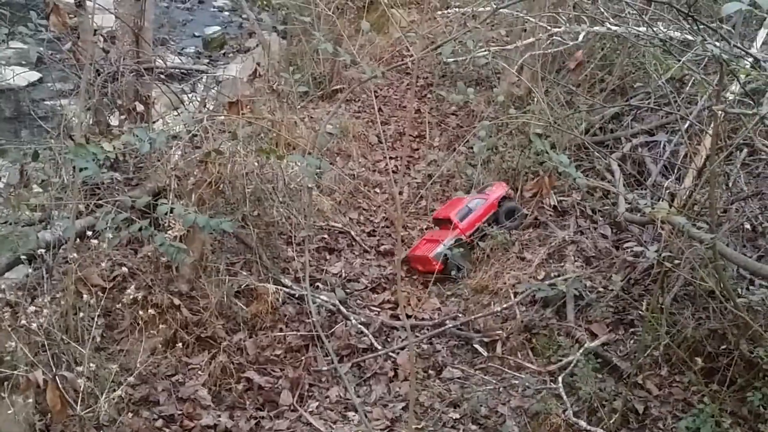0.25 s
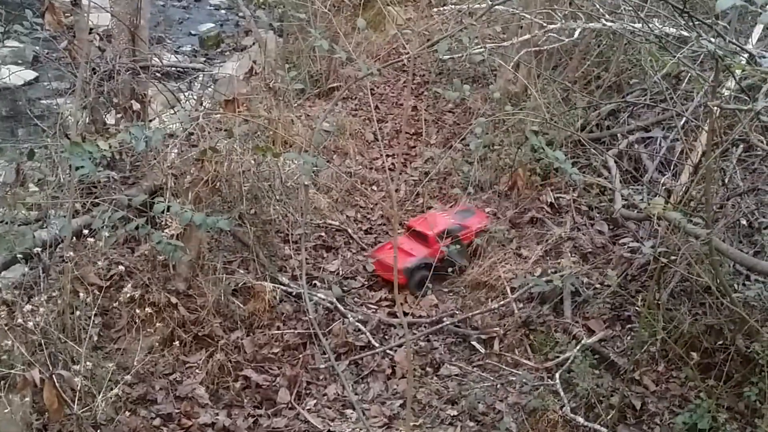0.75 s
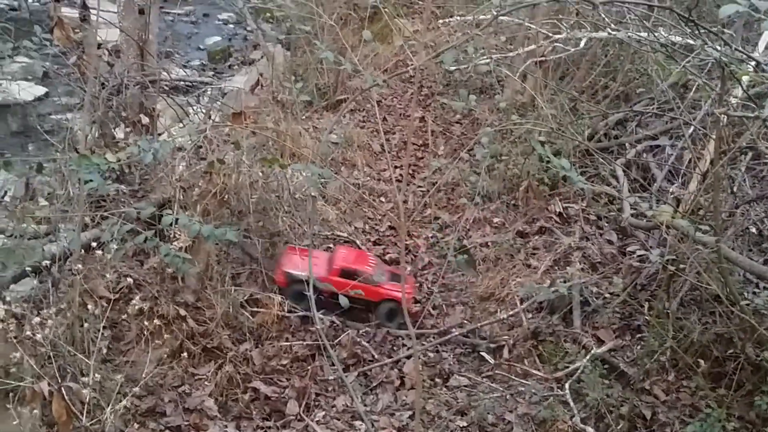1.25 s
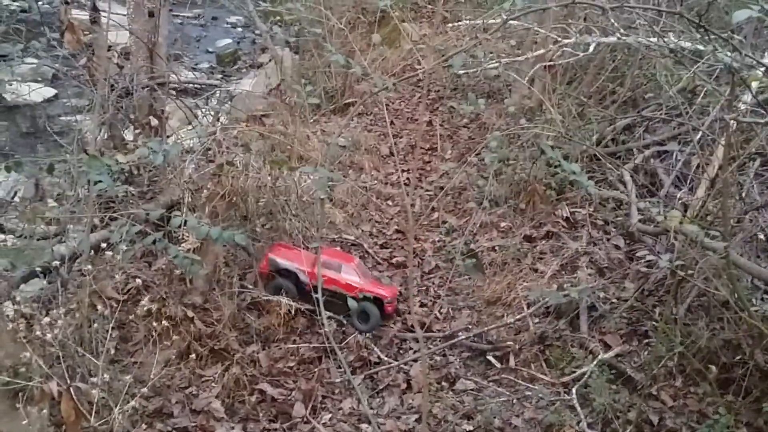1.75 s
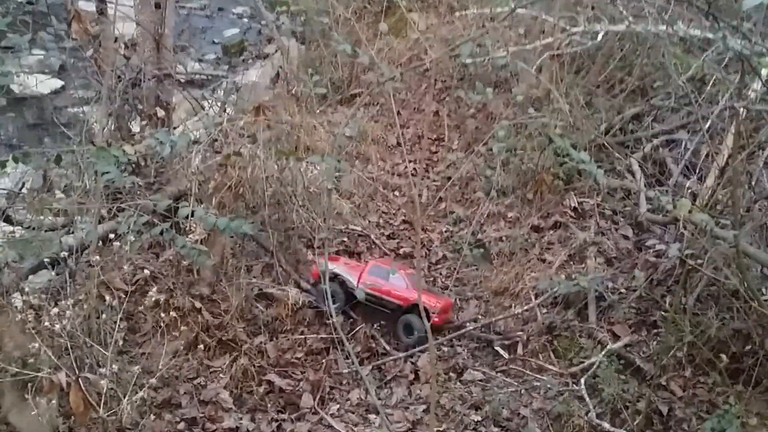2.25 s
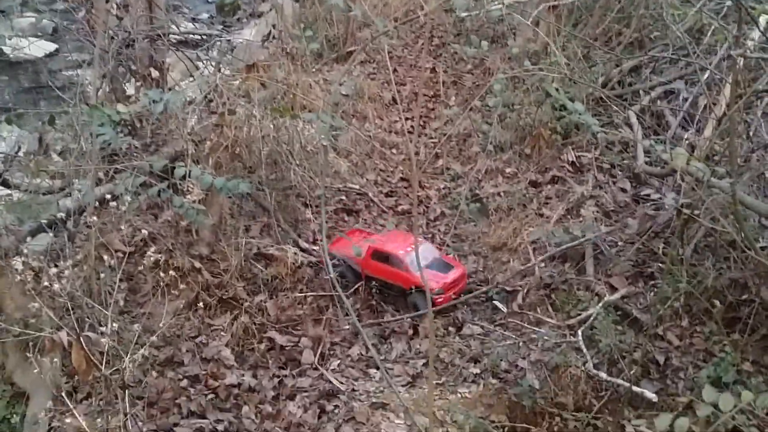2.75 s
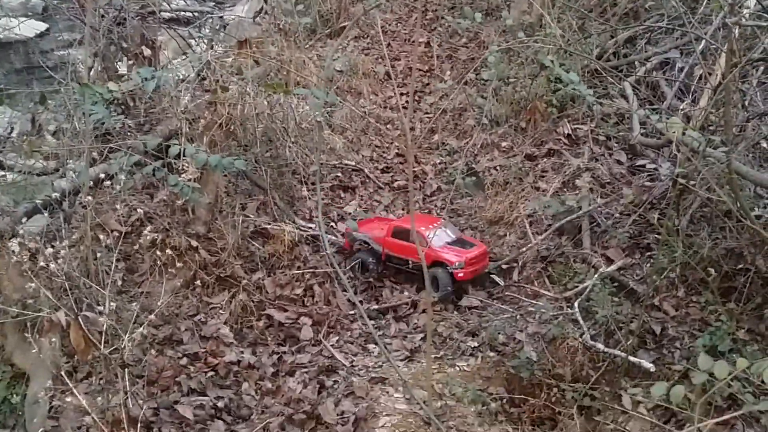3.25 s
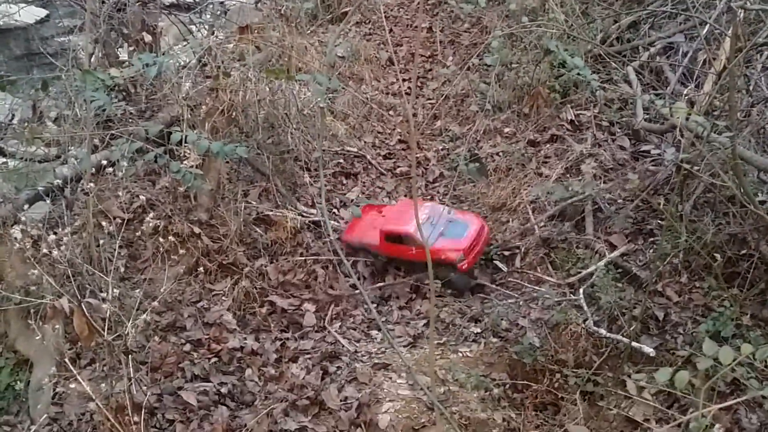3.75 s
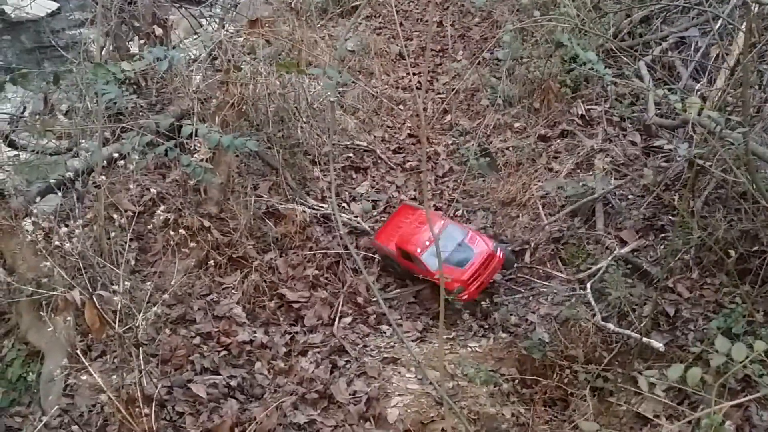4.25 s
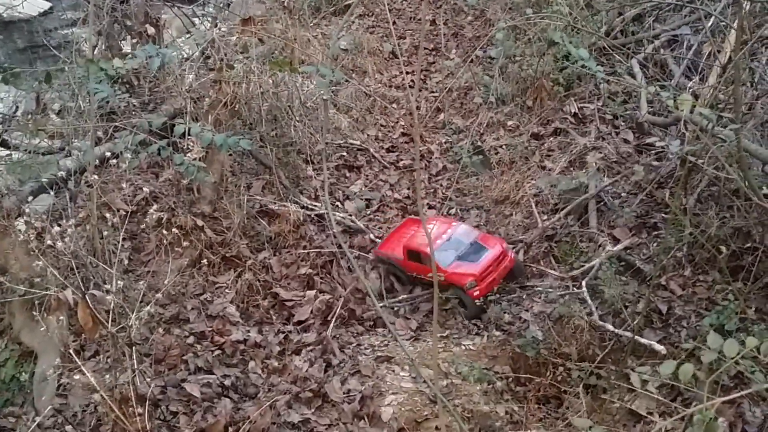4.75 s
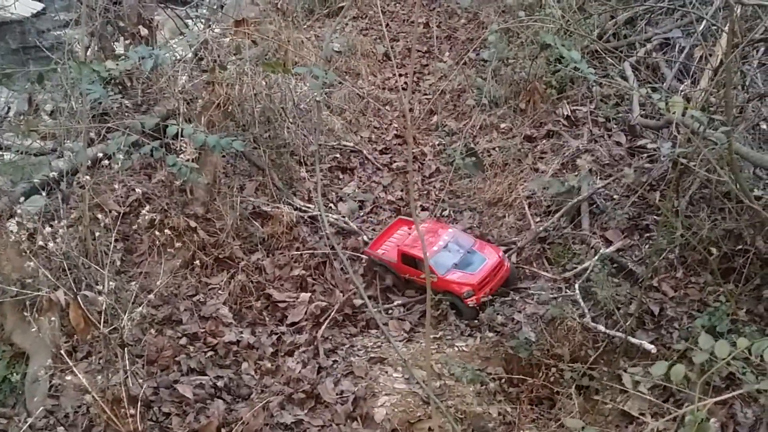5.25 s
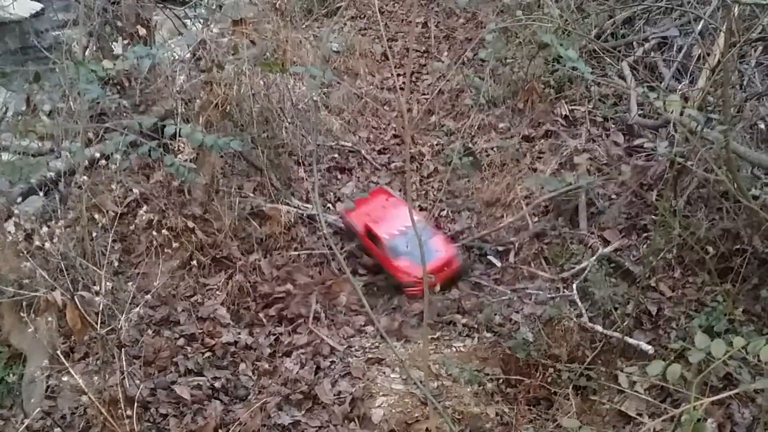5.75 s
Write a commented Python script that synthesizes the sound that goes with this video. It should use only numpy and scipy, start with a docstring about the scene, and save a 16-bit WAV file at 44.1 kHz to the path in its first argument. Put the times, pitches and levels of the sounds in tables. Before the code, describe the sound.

Outdoors in woods, a small electric toy truck moves over dry leaves, heard in close, bright stereo over a faint, slowly fading distant rumble. A few light plastic ticks and a soft crackle open the scene. From about 0.6 to 1.4 seconds it surges, crunching leaves, snapping twigs and giving brief high gear whines. Shorter bursts follow near 1.8 and 2.0 with sharp cracks and hollow knocks, then lighter rustling to 2.9. Tires rattle rapidly on the plastic shell around 3.0 and again from 3.4 to 3.9, with snaps continuing to 4.4. A fuller crunch and chassis knock come at 4.5 to 4.8. Thin motor whine and lighter crackle surface near 5.1, then hollow thumps build from 5.5 into the strongest lurch and loudest cracks around 5.7 to 5.8, dropping quickly away. Tiny leaf chirps run throughout, with only a very short tail from the trees.

```python
"""Toy truck on dry leaves in a wood

A small electric toy truck claws back and forth over dry leaves and twigs.
Leaves crush in dense grains, twigs snap and stiff leaf edges chirp against rubber and plastic.
Tyre lugs rattle on the plastic shell, the hollow chassis booms over bumps and the gears whine thinly.
Two microphone ports with unlike peaks and dips hear it with a short tail from the trees and a far rumble."""
import sys
import numpy as np
from scipy import signal
from scipy.fft import rfft, irfft
from scipy.io import wavfile
from scipy.ndimage import uniform_filter1d

SR = 44100
rng = np.random.default_rng(int(sys.argv[2]) if len(sys.argv) > 2 else 0)


def transcribe(signal):
    """Save signal, clipped to [-1, 1], as a 16-bit WAV file at the path in sys.argv[1]."""
    frames = np.atleast_2d(signal).T
    limited = np.clip(frames, -1, 1)
    pcm = np.round(limited * 32767).astype(np.int16)
    wavfile.write(sys.argv[1], SR, pcm)


def gain_from_db(level_db):
    """Convert decibel levels to linear amplitude factors (20 dB per decade)."""
    decades = np.asarray(level_db, float) / 20
    return 10 ** decades


N = 264589   # samples

# tyre lugs catching the shell; the low share goes to the shell modes below 1500 Hz:
# start_s [s], peak_db [dB], low_share_db [dB]
LUG_CATCHES = [(0.1052, -16.5, -27), (0.1336, -18.5, -15), (0.183, -22, -15.5), (1.2184, -33, -1),
               (1.3634, -31.5, -4), (1.7574, -18.5, -22), (1.779, -18.5, -12), (2.0333, -19, -15.5),
               (2.0441, -13.5, -22), (2.0504, -19.5, -8.5), (2.9265, -9, -20), (2.9515, -14.5, -14.5),
               (2.9696, -16, -28), (2.991, -21.5, -19), (3.017, -15, -28), (3.045, -14, -12.5),
               (3.088, -12, -19), (3.3951, -17.5, -11), (3.481, -17.5, -15), (3.5438, -22.5, -11),
               (3.5745, -14.5, -38), (3.603, -9.5, -23), (3.6364, -14.5, -19), (3.6638, -12.5, -33),
               (3.681, -12.5, -27), (3.8357, -10, -15), (3.918, -22, -5.5), (4.6663, -24, -3),
               (4.6744, -34, -18), (5.7576, -32, 9), (5.7994, -34, 4), (5.816, -21, -2.5)]


def rms_one(x):
    """Scale to rms 1."""
    return x / np.sqrt(np.mean(x ** 2) + 1e-20)


def at_hz(points, hz):
    """Read a spectrum of (Hz, dB) points on a log frequency axis."""
    point_hz, point_db = np.transpose(points)
    return np.interp(np.log(hz), np.log(point_hz), point_db)


def drift(rate_hz):
    """Slow random wander of rms 1: noise through two one-pole low-passes at rate_hz."""
    hop = 40   # samples between points of the wander
    r = np.exp(-2 * np.pi * rate_hz * hop / SR)
    slow = signal.lfilter([1], [1, -2 * r, r * r], rng.standard_normal(N // hop + 2002))
    slow = rms_one(slow[2000:])   # the filter has settled by here
    return np.interp(np.arange(N) / hop, np.arange(len(slow)), slow)


def ring(clicks, hz, t60):
    """A damped resonance: a unit click sets a sine of height 1 ringing, down 60 dB after t60 seconds."""
    r = gain_from_db(-60 / (t60 * SR))
    w = 2 * np.pi * hz / SR
    return signal.lfilter([0, np.sin(w)], [1, -2 * r * np.cos(w), r * r], clicks + 1e-18)


def soften(x, hz):
    """A soft contact dulls the treble: two one-pole low-passes."""
    r = np.exp(-2 * np.pi * hz / SR)
    return signal.lfilter([(1 - r) ** 2], [1, -2 * r, r * r], x)


def chatter(per_s, spread_db):
    """Random clicks of either sign, most small, a few large; rms 1."""
    sizes = gain_from_db(spread_db * np.minimum(rng.exponential(1, N), 5)) * rng.choice([-1, 1], N)
    happens = rng.random(N) < per_s / SR
    return rms_one(sizes * happens / np.sqrt(per_s))


def struck(modes, times, peaks_db, contact_s, scatter_db):
    """Each blow is a ragged burst of contacts; every mode takes it with a strength of its own."""
    length = 600   # samples
    steps = np.arange(length)
    at = (np.asarray(times) * SR).astype(int)[:, None] + steps
    burst = rng.standard_normal(at.shape) * np.exp(-steps / (contact_s * SR))
    chance_db = rng.normal(0, scatter_db, (len(at), len(modes)))
    out = 0
    for k, (hz, level_db, t60) in enumerate(modes):
        # the swing that the burst builds up in this mode sets how much force it needs
        swing = np.abs(np.cumsum(burst * np.exp(-2j * np.pi * hz * steps / SR), axis=1))
        height = gain_from_db(peaks_db(hz) + level_db + chance_db[:, k])
        force = np.zeros(N + length)
        np.add.at(force, at, burst * (height / swing.max(axis=1))[:, None])
        out = out + ring(force[:N], hz, t60)
    return out


def peaks_in_time(starts, lengths, levels_db, slopes, rise, fall):
    """Power of each event in time: a climb, a sloping hold and a fall, all straight in dB."""
    since = np.arange(N) / SR - np.asarray(starts)[:, None]
    lengths, levels_db, slopes = [np.reshape(v, (-1, 1)) for v in (lengths, levels_db, slopes)]
    hold_db = levels_db + slopes * np.clip(since, 0, lengths)
    climb_db = rise * np.minimum(since, 0)
    fall_db = fall * np.maximum(since - lengths, 0)
    return gain_from_db(2 * (hold_db + climb_db - fall_db))


def effort():
    """Crush and its colour follow the surges; boom and scrape follow the crush and swell at each lurch."""
    # spells of the wheels crushing leaves, hard under throttle or light while rolling out:
    # start_s [s], length_s [s], crush_db [dB], growth [dB/s], brightness of the litter [dB/octave]
    spells = [(0.0, 0.94, -36, -5, -1), (.56, 0.17, -27.5, -7, 1.6), (0.765, .12, -26.5, 10, 0.6),
              (1.013, 0.4, -24.5, -10, -0.1), (1.434, 0.22, -33.5, -44, -0.8), (1.66, .16, -27.5, -8, -1.5),
              (1.895, 0.24, -29.5, 0, -0.3), (2.251, 0.12, -27.5, -1, 1), (2.447, 0.41, -30, 9.5, 0.5),
              (2.91, 0.23, -28.5, -2, -1.2), (3.193, 0.15, -38, 4, 2.3), (3.413, 0.098, -31, -10, 1.3),
              (3.586, .13, -27, 16, 0), (3.806, .04, -26, -3, -2.7), (3.889, 0.12, -23.5, -12, -0.5),
              (4.076, 0.36, -34, -20.5, -0.1), (4.484, 0.31, -24.5, 2.5, -0.4),
              (5.073, 0.25, -28, -6, -1.3), (5.565, 0.15, -25.5, 33.5, -0.2),
              (5.773, 0.36, -23.5, -51, -0.8)]
    # the frame lurching over roots and stalks: start_s [s], boom_db [dB], scrape_db [dB]
    lurches = [(0.0, -38, -44.5), (.66, -44, -59), (0.852, -33.5, -51), (.99, -39, -47), (1.14, -34, -32.5),
               (1.44, -36, -42.5), (1.788, -31.5, -33.5), (2.09, -31, -36.5), (2.34, -39, -39.5),
               (2.722, -42, -42), (2.972, -27.5, -31), (3.41, -44, -41.5), (3.69, -29.5, -29.5),
               (3.86, -31.5, -31.5), (3.97, -28, -50), (4.48, -40, -46), (4.67, -30.5, -27),
               (5.23, -34.5, -31), (5.359, -32.5, -43.5), (5.571, -41, -35.5), (5.73, -22, -27),
               (5.83, -27, -31)]
    *shape, bright = np.transpose(spells)
    surges = peaks_in_time(*shape, rise=202, fall=149)   # dB/s
    crush = surges.sum(axis=0)
    start_s, boom_db, scrape_db = np.transpose(lurches)
    boom = peaks_in_time(start_s, 0, boom_db, 0, rise=129, fall=133).sum(axis=0)
    boom = boom + crush * gain_from_db(-2 * 23)   # 23 dB under the crush between lurches
    scrape = peaks_in_time(start_s, 0, scrape_db, 0, rise=108, fall=101).sum(axis=0)
    scrape = scrape + crush * gain_from_db(-2 * 24)
    crush_db, boom_db, scrape_db = 10 * np.log10([crush, boom, scrape])
    bright_db = bright @ surges / crush   # each spell counts by its power
    return crush_db, boom_db, scrape_db, bright_db


def far_rumble():
    """Smooth distant noise, nearly alike at both ports, slowly fading."""
    # colour of the distance: pitch_hz [Hz], level_db [dB per Hz, relative]
    spectrum = [(25, -12), (55, 0.5), (95, 3.5), (130, -11.5), (250, -13.5), (400, -46), (1000, -36),
                (2000, -27), (5000, -66), (14000, -129)]
    rumble_db = -39.5   # start level [dB]
    hz = np.maximum(np.arange(N // 2 + 1) * SR / N, 1)
    mid, side = irfft(rfft(rng.standard_normal((2, N))) * gain_from_db(at_hz(spectrum, hz)), N)
    level_db = rumble_db - 1.3 * np.arange(N) / SR + 2.0 * drift(9)   # sinks 1.3 dB/s
    return gain_from_db(level_db) * rms_one(mid + 0.3 * side * [[1], [-1]])


def woods(x, t60, level_db):
    """Trunks and litter scatter a short tail, unlike at each port."""
    t = np.arange(int(.15 * SR)) / SR
    tail = rng.standard_normal((2, len(t))) * gain_from_db(-60 * t / t60) * (t > .002)
    tail = tail / np.sqrt(np.sum(tail[0] ** 2))
    return gain_from_db(level_db) * signal.fftconvolve(x, tail, axes=1)[:, :N]


def gears():
    """The gear train whines in thin wavering tones that glide with motor speed and fade in and out."""
    # one list of points per stretch of whine: start_s [s], pitch_hz [Hz], level_db [dB]
    stretches = [
        [(2.0, 980, -65), (2.6, 1010, -52), (3.4, 980, -59)],
        [(5.0, 760, -41), (5.08, 1000, -45)],
        [(.89, 2700, -29), (.94, 2654, -31)],
        [(1.08, 2710, -47), (1.17, 2770, -40), (1.25, 2700, -30)],
        [(1.12, 4600, -49), (1.21, 4320, -22)],
        [(5.12, 2390, -44), (5.23, 2810, -36.5), (5.31, 2820, -43)],
        [(5.12, 4560, -26.5), (5.22, 5380, -47)],
        [(5.47, 787, -30), (5.52, 887, -39.5), (5.55, 1080, -40)],
    ]
    t, out = np.arange(N) / SR, np.zeros(N)
    waver, flutter = drift(37.5), drift(25)
    for points in stretches:
        s, hz, level_db = np.transpose(points)
        fade = np.clip(np.minimum(t - s[0], s[-1] - t) / .025, 0, 1)
        turns = np.cumsum(np.interp(t, s, hz) * (1 + 0.02 * waver)) / SR
        level = gain_from_db(np.interp(t, s, level_db) + 4.5 * flutter)
        out += fade * level * np.sin(2 * np.pi * turns)
    return out


def chassis(boom_db):
    """The hollow frame rings low under wheel jolts and larger landings; too small to radiate deep bass."""
    # ringing modes of the frame: pitch_hz [Hz], level_db [dB], t60_s [s]
    modes = [(183, -33.5, 0.26), (259.1, 0, 0.091), (290, -9, 0.043), (522, -0.5, 0.027), (881, -8, 0.13)]
    # landings on bumps: start_s [s], peak_db [dB]
    bumps = [(0.628, -26.5), (1.132, -26), (1.221, -31), (1.766, -28), (2.032, -23), (2.085, -22.5),
             (3.396, -26), (3.483, -25), (3.838, -22), (3.904, -20), (4.47, -21), (4.656, -18),
             (4.737, -43), (5.324, -24.5), (5.524, -22.5), (5.555, -14.5), (5.572, -14.5), (5.718, -13),
             (5.797, -22), (5.827, -16.5)]
    jolts = chatter(500 * gain_from_db(3.0 * drift(11)), spread_db=3.0)
    hum = sum(gain_from_db(level_db) * ring(jolts, hz, t60) for hz, level_db, t60 in modes)
    hum = soften(hum, hz=645)
    # a slow levelling keeps the frame's hum steady
    hum = hum / uniform_filter1d(hum ** 2, size=2600) ** 0.063
    start_s, peak_db = np.transpose(bumps)
    landings = struck(modes, start_s, lambda hz: peak_db, contact_s=0.01, scatter_db=3.0)
    both = gain_from_db(boom_db) * rms_one(hum) + soften(landings, hz=940)
    return signal.sosfilt(signal.butter(2, 140.0, "high", fs=SR, output="sos"), both)


def shell(scrape_db):
    """Lugs knock the plastic shell into ringing, stalks scratch along it."""
    # ringing modes of the shell: pitch_hz [Hz], level_db [dB], t60_s [s]
    modes = [(515, -15.5, 0.055), (963, 15, 0.01), (1265, 7, 0.027), (1844, -4.5, 0.014),
             (2056, 5.5, 0.0082), (2690, -9, 0.022), (3680, -5, 0.012)]
    start_s, peak_db, low_db = np.transpose(LUG_CATCHES)
    knocks = struck(modes, start_s, lambda hz: peak_db + low_db * (hz < 1500),
                    contact_s=.003, scatter_db=3.0)
    # the knocks carry little bass
    knocks = signal.sosfilt(signal.butter(2, 600.0, "high", fs=SR, output="sos"), knocks)
    stalks = soften(chatter(2500 * gain_from_db(6.2 * drift(12)), spread_db=5.0), hz=640)
    scrape = sum(gain_from_db(level_db) * ring(stalks, hz, t60) for hz, level_db, t60 in modes)
    return soften(knocks, hz=5330) + gain_from_db(scrape_db) * rms_one(scrape)


def squeaks(crush_db, count):
    """Stiff leaf edges slip along rubber and plastic: faint gliding chirps of 6 to 41 ms."""
    out = np.zeros(N + SR)
    for when, pitch, glide, size, span in rng.random((count, 5)):
        start = int(when * N)
        length = int((0.0057 + 0.0352 * span) * SR)
        hz = 2400 * 3.2 ** pitch * (1 + 0.132 * (glide - .5) * np.linspace(-1, 1, length))
        chirp = np.hanning(length) * np.sin(2 * np.pi * np.cumsum(hz) / SR)
        out[start:start + length] += gain_from_db(crush_db[start] - 13.5 + 8.3 * size) * chirp
    return out[:N]


def snaps(crush_db, count):
    """A short burst of splintering fibres, part of it coloured by the pitch of the twig."""
    # twigs and stiff leaves snapping: start_s [s], peak_db [dB], pitch_hz [Hz]
    twigs = [(0.1805, -24, 4220), (0.223, -24, 4320), (0.463, -22, 7900), (0.856, -10, 4500),
             (1.0167, -10, 3360), (1.2421, -13, 5950), (1.2665, -8.5, 6060), (1.3828, -13, 5900),
             (1.7575, -5.5, 4830), (1.7789, -17, 5600), (1.9878, -16.5, 3900), (2.037, -13, 5700),
             (2.0395, -10, 5650), (2.2917, -11, 5400), (2.46, -15, 4900), (3.4985, -14, 3580),
             (3.6056, -9.5, 3870), (3.877, -7, 3950), (3.904, -8, 3620), (4.0094, -13, 3880),
             (4.087, -13.5, 3900), (4.11, -15, 5950), (4.129, -14, 5800), (4.1974, -16, 4150),
             (4.2125, -19, 3680), (4.3335, -21.5, 5170), (4.3834, -20, 4500), (5.015, -46.5, 5300),
             (5.4802, -21, 4230), (5.7544, -10, 5010), (5.7803, -2, 5760), (5.8175, -8, 5000)]
    length = 600   # samples
    out, t = np.zeros(N + length), np.arange(length) / SR
    small = []   # lesser twigs break at random, 7 to 15 dB over the crush
    for when, size, pitch in rng.random((count, 3)):
        peak_db = crush_db[int(when * N)] + 7 + 8 * size
        small.append((when * N / SR, peak_db, 3500 * 1.7 ** pitch))
    # each lug lets go with a bright crack
    cracks = [(s, peak_db - 7, 4750) for s, peak_db, _ in LUG_CATCHES]
    for s, peak_db, hz in list(twigs) + cracks + small:
        noise = rng.standard_normal(length)
        fibres = soften(np.diff(noise, prepend=0), hz=8000)
        fibres = fibres * (np.exp(-t / .0007) + .3 * np.exp(-t / .006))
        both = rms_one(fibres) + 0.87 * rms_one(ring(fibres, hz, 0.0027))
        start = int(s * SR)
        out[start:start + length] += gain_from_db(peak_db) * both / np.abs(both).max()
    return out[:N]


def leaves(crush_db, bright_db):
    """Thousands of tiny fractures in clumps; each rings a few cycles and has its own lag between the ports."""
    # colour of the litter: pitch_hz [Hz], level_db [dB per Hz, relative]
    litter_colour = [(700, -10.5), (1200, -0.5), (1800, -7), (2700, -2.5), (5000, -1), (8000, -13),
                     (11000, -6.5), (14000, -3)]
    detour_share, detour_lag, lag_spread = .3, 60, 1.1   # share of grains; lag spreads in samples
    effort_db = crush_db - crush_db.max()
    # dB per octave: heavy crushing breaks thicker stuff and is duller
    tilt_db = bright_db - 0.14 * effort_db
    # harder crushing breaks more, in clumps
    per_s = 24000 * gain_from_db(.15 * effort_db + 1.5 * drift(25))
    clicks = chatter(per_s, spread_db=1.3)
    clicks = clicks * gain_from_db(0.87 * drift(40) + 0.72 * drift(4.86))
    at = np.flatnonzero(clicks)
    grains = clicks[at]
    # some grains reach one port by a detour
    spread = np.where(rng.random(len(at)) < detour_share, detour_lag, lag_spread)
    lag = np.rint(spread * rng.standard_normal(len(at))).astype(int)
    pan = gain_from_db(4.3 * rng.standard_normal(len(at)))
    pitches = np.geomspace(700, 14500, 18)
    dealt = rng.integers(0, 18, len(at))   # each grain gets one pitch
    out = 0
    for k, hz in enumerate(pitches):
        mine, pair = dealt == k, np.zeros((2, N))
        pair[0, at[mine]] = grains[mine] * np.sqrt(pan[mine])
        pair[1, np.clip(at[mine] + lag[mine], 0, N - 1)] = grains[mine] / np.sqrt(pan[mine])
        colour_db = at_hz(litter_colour, hz) + tilt_db * np.log2(hz / 5000) + 0.5 * drift(1.8)
        out = out + hz * gain_from_db(colour_db) * ring(pair, hz, 8.2 / hz)
    return gain_from_db(crush_db) * out / np.std(out)


def scene():
    """The truck and the litter under it, a short tail from the trees and the far rumble."""
    # where the wheels work: start_s [s], lean towards the left [dB]
    place = [(0, 1), (.7, 3), (1.6, 0), (3.2, 0.5), (3.8, -0.5), (6, 0)]
    t = np.arange(N) / SR
    crush_db, boom_db, scrape_db, bright_db = effort()
    truck = chassis(boom_db) + shell(scrape_db) + gears()
    litter = leaves(crush_db, bright_db) + snaps(crush_db, count=110) + squeaks(crush_db, count=200)
    sides = gain_from_db(np.interp(t, *np.transpose(place)) / 2 * np.array([[1], [-1]]))
    scattered = woods(truck[None], t60=.05, level_db=-12)
    return sides * litter + truck + scattered + far_rumble()


def low_pass(x):
    """Removes everything above the highest recorded frequency."""
    return signal.sosfilt(signal.butter(12, 15480, fs=SR, output="sos"), x)


def record(dry):
    """Each pickup has its own peaks and dips, bass and top are cut; the right one lies a little farther away."""
    # peaks and dips of the left pickup, then of the right: port resonances, ground-echo notches
    # and treble loss: pitch_hz [Hz], width_hz [Hz], gain_db [dB]
    ports = [
        [(710, 83, -4), (1730, 56, 3.5), (6920, 2300, 14), (4500, 14300, 2)],
        [(790, 120, -6.5), (1900, 860, -3.5), (3655, 570, 5), (4830, 3140, 12.5), (13280, 880, -30)],
    ]
    # gain of the left and the right port [dB]
    port_gains = [-4, 1]
    right_lag, ceiling = 4.22, .9   # samples; full scale is 1
    out = []
    for x, bells, port_db in zip(dry, ports, port_gains):
        for hz, width_hz, gain_db in bells:
            w, g = 2 * np.pi * hz / SR, gain_from_db(gain_db / 2)
            a = np.sin(w) * width_hz / hz / 2
            top = [1 + a * g, -2 * np.cos(w), 1 - a * g]
            bottom = [1 + a / g, -2 * np.cos(w), 1 - a / g]
            x = signal.lfilter(top, bottom, x)
        out.append(gain_from_db(port_db) * x)
    delay = np.exp(-2j * np.pi * np.arange(N // 2 + 1) * right_lag / N)
    out[1] = irfft(rfft(out[1]) * delay, N)
    out = signal.sosfilt(signal.butter(2, 101.5, "high", fs=SR, output="sos"), out)
    out = ceiling * np.tanh(out / ceiling)   # waveform peaks are rounded
    out = signal.sosfilt(signal.cheby2(16, 60, 14800, fs=SR, output="sos"), out)
    return low_pass(out)


dry = scene()
out = record(dry)
transcribe(out)
```